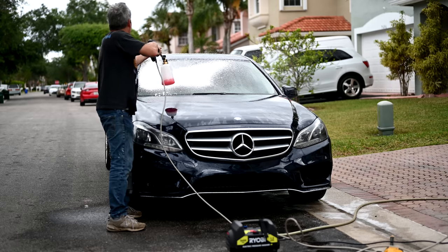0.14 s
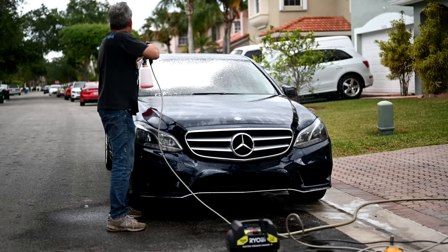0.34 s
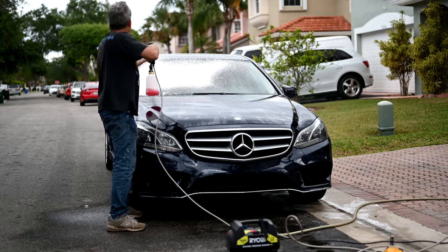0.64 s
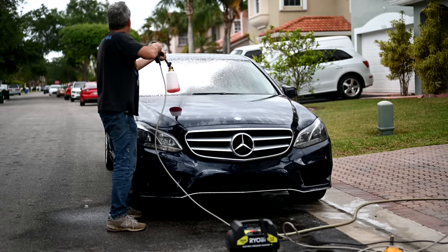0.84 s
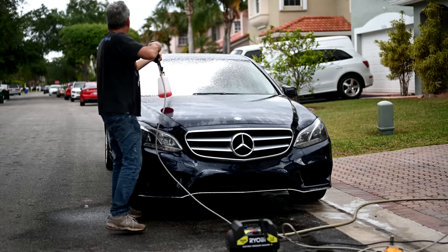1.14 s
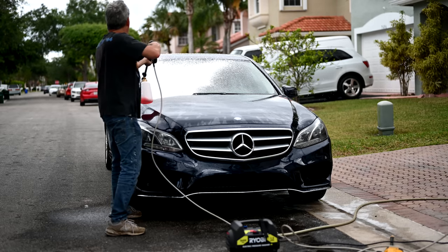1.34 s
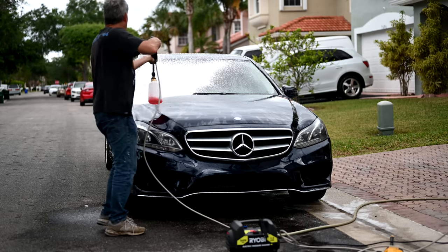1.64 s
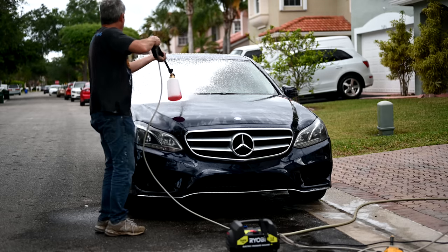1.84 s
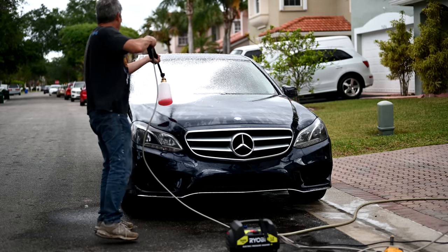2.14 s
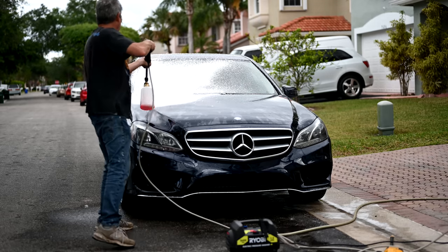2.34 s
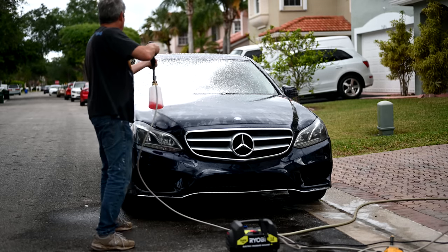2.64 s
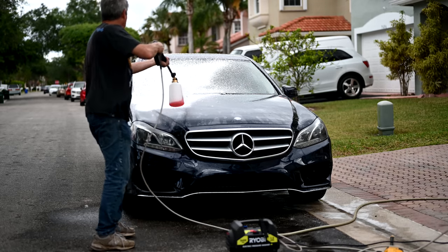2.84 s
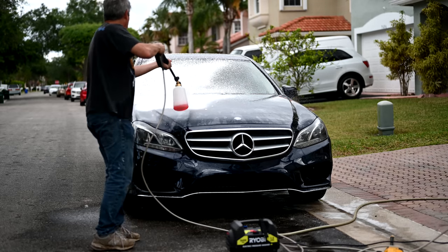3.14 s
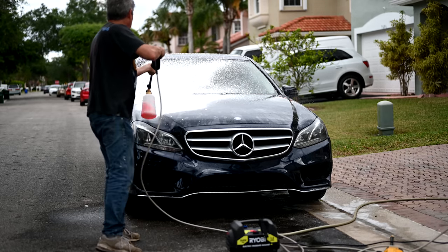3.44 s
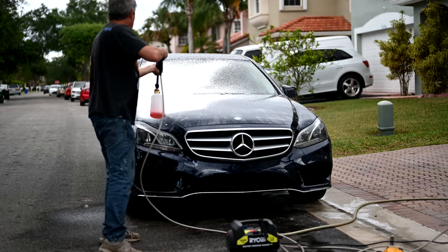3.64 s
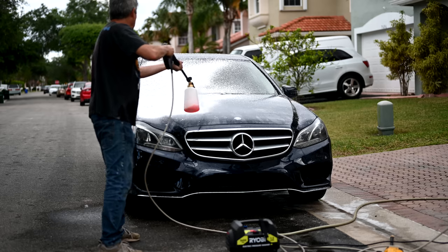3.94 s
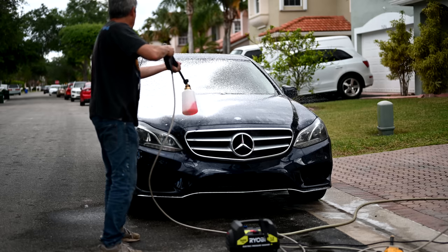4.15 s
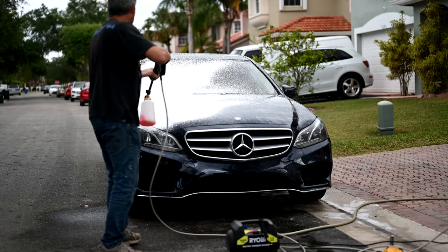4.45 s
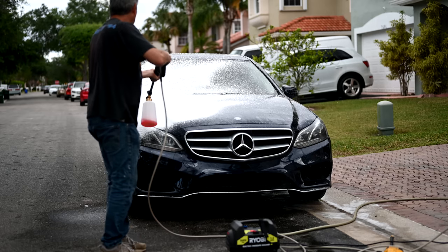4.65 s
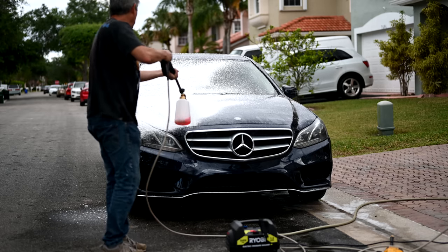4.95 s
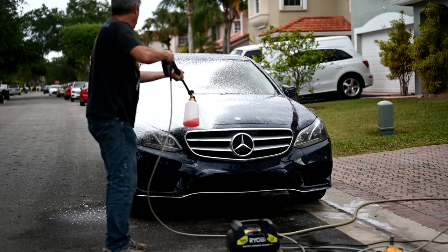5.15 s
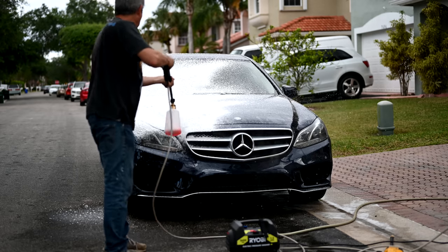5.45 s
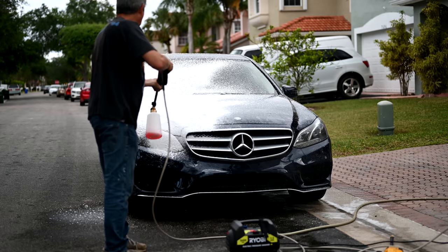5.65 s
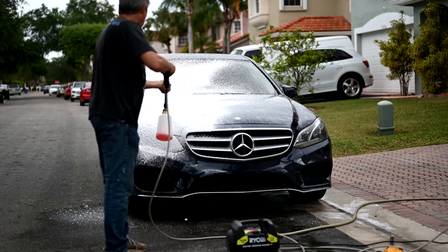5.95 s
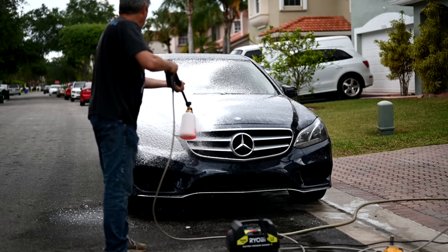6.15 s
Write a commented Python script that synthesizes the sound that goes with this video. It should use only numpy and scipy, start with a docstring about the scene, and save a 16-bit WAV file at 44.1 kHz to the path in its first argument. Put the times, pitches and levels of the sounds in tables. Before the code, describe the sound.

An electric pressure washer runs continuously on an open street, feeding a foam sprayer swept over a parked car. A midrange nozzle roar and broad rushing spray dominate, dipping briefly at some sweep ends. A thin, very high motor whine wavers and slowly climbs over faint pump hum. The roar weakens in the second half as crisp droplet hiss grows. Soft drumming on bodywork and faint wind puffs reach one open-air microphone.

```python
"""An open street, one microphone: an electric pressure washer feeds a foam cannon swept over a parked car.
Sines locked to one shaft make the motor's whine and the pump's hum; two shifting resonances make the roar.
Filtered noise and tiny impacts make the rush, fizz, droplet hiss and the drumming on the panels;
the hiss grows louder towards the end. Light gusts, low filtered noise, rumble on the microphone.
"""
import sys
import numpy as np
from scipy import signal
from scipy.fft import rfft, irfft, next_fast_len
from scipy.io import wavfile
from scipy.ndimage import uniform_filter1d

SR = 44100
rng = np.random.default_rng(int(sys.argv[2]) if len(sys.argv) > 2 else 0)


def wav_record(signal):
    """Record a signal, one row per channel, as 16-bit PCM in the file named by sys.argv[1]."""
    frames = np.transpose(np.atleast_2d(signal))
    bounded = np.clip(frames, -1, 1)
    # unit amplitude maps onto the largest positive 16-bit level
    quanta = np.round(bounded * 32767).astype(np.int16)
    wavfile.write(sys.argv[1], SR, quanta)


N = 278003  # length in samples

# Whine cycles, and pump strokes, per turn of the motor shaft.
WHINE_ORDER, PUMP_GEAR = 22, .22

# The motor slowly gathers speed. Each row: time in seconds, course of the whine's pitch in Hz.
WHINE_PITCH = [(0, 6060), (1.05, 6160), (1.75, 6205), (2.6, 6188), (3.0, 6250), (3.7, 6220), (4.5, 6290),
               (5.1, 6250), (6.3, 6352)]


def shaft_turns(wander_hz=10):
    """Turns of the motor shaft so far: its speed summed over time, straying at random from its course."""
    course_hz, = curves(WHINE_PITCH)
    whine_hz = course_hz + wander_hz * walk(6.98)
    return np.cumsum(whine_hz / WHINE_ORDER) / SR


# Strength of the whine before its fades. Each row: time in seconds, level in dB.
WHINE_STRENGTH = [(0, -50), (.3, -36.5), (1.42, -38.5), (1.76, -28), (1.9, -34.5), (2.38, -28.5),
                  (2.72, -41), (3.0, -27.5), (3.45, -28.5), (3.7, -22), (4.2, -29.5), (4.55, -27.5),
                  (4.95, -30), (5.12, -43), (5.5, -22.5), (5.78, -31), (6.03, -25), (6.3, -26)]
# The whine fades for moments. Each row: centre in seconds, length in seconds, drop in dB.
WHINE_DROPS = [(1.23, .1, 5), (2.29, 0.08, 12), (2.459, 0.051, 8), (3.537, 0.08, 14), (3.746, 0.054, 11),
               (3.91, .05, 6), (4.771, .1, 9)]


def motor_whine(turns, sway_rad=0.29, throb=0.24, flutter_rad=0.3, waver_db=2.0):
    """Every pump stroke loads the motor, so its whine sways in pitch and throbs in strength."""
    stroke = 2 * np.pi * PUMP_GEAR * turns
    level_db, = curves(WHINE_STRENGTH)
    for centre_s, length_s, drop_db in WHINE_DROPS:
        level_db = level_db - drop_db * bump(centre_s, length_s)
    phase = 2 * np.pi * WHINE_ORDER * turns + sway_rad * np.sin(stroke) + flutter_rad * walk(90)
    strength = undb(level_db + waver_db * walk(24.5)) * (1 - throb * np.cos(stroke))
    return strength * np.sin(phase)


# Other motor tones. Each row: multiple of the shaft rate, level in dB at the start, midway and at the end.
MOTOR_HARMONICS = [(11, -38.5, -46.5, -67), (20, -63, -49, -43.5), (21, -66, -52, -46), (23, -62, -41, -32),
                   (24, -60, -46, -47), (33, -47.5, -47.5, -58), (44, -63, -57, -54)]
# Pump hum and gear whine. Each row: multiple of the stroke rate (rounded to a whole number when played),
# level in dB at the start, midway and at the end.
PUMP_HARMONICS = [(3, -61, -57, -50.5), (4, -52, -52, -48.5), (5, -56.5, -58.5, -57), (6, -57, -59, -53),
                  (9, -58, -49, -48.5), (10, -69, -59, -52), (11, -68, -54.5, -50.5),
                  (12, -60.5, -48, -47.5), (107.5, -58, -40.5, -36)]


def washer(turns):
    """Motor whine, once-a-turn hum of the shaft, other motor tones and the geared piston pump."""
    shaft = undb(-56) * np.sin(2 * np.pi * turns)
    shaken_turns = turns + .0026 * walk(40)  # slight unsteadiness, in turns
    motor = tones(MOTOR_HARMONICS, shaken_turns, waver_db=3.6)
    pump = tones(PUMP_HARMONICS, PUMP_GEAR * turns, waver_db=2.37)
    return np.sqrt(2) * (motor_whine(turns) + shaft + motor + pump)  # root 2: levels are rms


def tones(table, turns, waver_db):
    """Harmonics of a rotation; each drifts in level and wavers on its own."""
    total = np.zeros(N)
    progress = np.linspace(0, 2, N)  # start, midway, end
    for order, *levels_db in table:
        level_db = np.interp(progress, np.arange(len(levels_db)), levels_db) + waver_db * walk(6)
        phase = 2 * np.pi * (round(order) * turns + rng.random())
        total += undb(level_db) * np.sin(phase)
    return total


# The lance sweeps to and fro; at the far end of a sweep the jet points away from the car.
# Each row: centre in seconds, length in seconds, drop of the roar in dB.
SWEEP_ENDS = [(1.37, 0.14, 3.5), (2.422, 0.15, 6), (4.522, .17, 7), (5.521, 0.084, 5.5)]


def pointing_away(edge=2.8):
    """Drop of the roar in dB as the jet leaves the car and returns."""
    return sum(drop_db * bump(centre_s, length_s, edge) for centre_s, length_s, drop_db in SWEEP_ENDS)


# The cannon's resonances shift as the lance is lowered. Each row: time in seconds,
# lower resonance and its width in Hz, upper resonance and its width in Hz.
CANNON_RESONANCES = [(0, 2140, 480.5, 2680, 952), (.42, 2222, 479.5, 2562, 850),
                     (.7, 2020, 779.4, 2770, 629), (1.3, 2130, 649, 2858, 580),
                     (1.8, 2250, 540, 2689, 538.8), (2.3, 2190, 487.7, 2664, 620),
                     (2.7, 2030, 419, 2728, 619), (4.3, 1846, 431.6, 2704, 817.3),
                     (5.1, 1932, 827.6, 2745, 753), (6.3, 2150, 621, 2750, 850)]
# The roar before the sweeps. Each row: time in seconds, lower and upper resonance level in dB.
ROAR_LEVELS = [(0, -32, -25), (.45, -27, -24), (.92, -26.5, -22), (1.55, -30, -25), (1.71, -25, -20),
               (1.88, -26, -25), (2.3, -29, -21.5), (2.58, -25.5, -25.5), (2.8, -26, -23.5),
               (3.05, -29.5, -23.5), (3.25, -25, -24.5), (3.36, -28, -31), (3.65, -34, -33),
               (3.8, -30, -29.5), (4.3, -31.5, -28.5), (4.7, -33.5, -34.5), (5.35, -34, -29),
               (5.82, -38, -35.5), (6.3, -35.5, -36)]


def cannon(away_db, sputter_db=0.1):
    """Air and soap churn through the nozzle, which roars unevenly in two resonances."""
    lower_hz, lower_width, upper_hz, upper_width = curves(CANNON_RESONANCES)
    lower_db, upper_db = curves(ROAR_LEVELS)
    lower = undb(lower_db) * resonance(lower_hz, lower_width)
    upper = undb(upper_db) * resonance(upper_hz, upper_width)
    return (lower + upper) * undb(sputter_db * walk(73) - away_db)


def resonance(hz, width_hz):
    """Turbulence in a steep-sided resonance: a tone whose strength and phase tumble faster the wider it is."""
    place = np.cumsum(width_hz) / SR * 20  # wider resonances read through the noise faster
    real, imaginary = rng.standard_normal((2, 2 * N))
    lowpass = signal.butter(3, 1 / 20, output="sos")
    tumble = signal.sosfilt(lowpass, real + 1j * imaginary)
    tone = np.exp(2j * np.pi * np.cumsum(hz) / SR)
    return unit(np.real(np.interp(place, np.arange(2 * N), tumble) * tone))


# The spray moves from the windscreen to the bonnet.
# Each row: time in seconds, then rush, fizz of the foam and droplet hiss, as levels in dB before the sweeps.
SPRAY_LEVELS = [(0, -26, -49, -40.5), (.5, -27.5, -47, -43), (.73, -27.5, -37, -32), (1.2, -29, -42, -34),
                (1.67, -27, -36, -32.5), (1.95, -28, -39, -36.5), (2.6, -27, -36, -32),
                (3.0, -30.5, -41, -34), (3.36, -30.5, -40.5, -30.5), (3.44, -30, -39, -27.5),
                (4.2, -30, -41, -30.5), (4.57, -30.5, -41, -24.5), (4.68, -29.5, -38, -23.5),
                (5.82, -30, -35, -21.5), (6.04, -28, -37, -19.5), (6.3, -29.5, -34, -22)]
# Spray drumming on the bodywork. Each row: time in seconds, level in dB.
DRUMMING_LEVEL = [(0, -39.5), (1.35, -37.5), (1.72, -35.5), (3.0, -35.5), (4.4, -35.5), (6.3, -34)]
# Spectra of the four spray layers. Each row: frequency in Hz, relative density in dB per Hz.
RUSH_SPECTRUM = [(400, -28), (800, -11.5), (1080, -1.5), (1420, -1), (2000, 2.5), (3300, 3), (4100, 1),
                 (4700, 0), (5900, -1), (6800, -12), (9000, -16), (15000, -37)]
FIZZ_SPECTRUM = [(6000, -25), (9000, 3.5), (10200, 0.5), (11400, 4), (12500, 2), (13300, -9), (14200, -15),
                 (16000, -21)]
HISS_SPECTRUM = [(4000, -41), (5700, -15.5), (6300, 1), (6750, 0), (7200, 1), (8200, 2), (9100, -1.5),
                 (10000, -7), (11000, -10), (12400, -33), (14000, -17), (16000, -23)]
PANEL_SPECTRUM = [(60, -47), (130, -11.5), (220, -2.5), (300, -0.5), (450, 2), (700, 0), (1050, 1),
                  (1400, -4), (2200, 3), (4000, -22.5), (8000, -34)]


def spray(turns, away_db, pulsing=0.096, sweep_share=0.65):
    """The jet rushes, foam fizzes and droplets land; jet and fine spray pulse with the pump."""
    rush_db, fizz_db, hiss_db = curves(SPRAY_LEVELS)
    panel_db, = curves(DRUMMING_LEVEL)
    rush = undb(rush_db) * colour(rng.standard_normal(N), RUSH_SPECTRUM)
    rush = reflect(rush, body_db=-16.5, road_db=-22)
    fizz = undb(fizz_db) * colour(droplets(per_second=4000, spread_db=3, mist_db=7), FIZZ_SPECTRUM)
    hiss = undb(hiss_db) * colour(droplets(per_second=4500, spread_db=3, mist_db=-4.0), HISS_SPECTRUM)
    panels = undb(panel_db) * colour(droplets(per_second=2500, spread_db=3.5, mist_db=3), PANEL_SPECTRUM)
    # the spray drops by a share of the roar's drop, in dB
    jet = (rush + fizz + hiss) * undb(-sweep_share * away_db)
    pulse = 1 + pulsing * np.cos(2 * np.pi * PUMP_GEAR * turns)
    return jet * pulse + panels


def droplets(per_second, spread_db, mist_db):
    """Tiny impacts of uneven size, all pushing the same way, over a smooth mist."""
    hit = rng.random(N) < per_second / SR
    size = np.minimum(rng.exponential(size=N), 5)  # caps the rare giants
    impacts = hit * undb(spread_db * size)
    mist = undb(mist_db) * rng.standard_normal(N)  # level relative to the impacts
    return mist - unit(impacts - impacts.mean())


# The echo off the bodywork shifts as the jet moves, mostly later. Each row: time in seconds, lag in ms.
BODY_ECHO = [(0, 0.9), (.42, 0.89), (.65, .7), (1.45, .68), (2.45, 0.89), (2.8, 1.01), (3.7, 1.023),
             (3.92, 1.54), (5.2, 2.46), (6.3, 2.65)]


def reflect(x, body_db=-10, road_db=-14, dull_hz=7000):
    """Bodywork and road throw the sound back; the moving lags comb it into a hollow swoosh."""
    dull = signal.sosfilt(signal.bessel(1, dull_hz, fs=SR, output="sos"), x)
    body_ms, = curves(BODY_ECHO)
    road_ms = 4.25 + .12 * walk(1)  # drifts gently
    now = np.arange(N)
    body = np.interp(now - body_ms * SR / 1000, now, dull)
    road = np.interp(now - road_ms * SR / 1000, now, dull)
    return x + undb(body_db) * body + undb(road_db) * road


# Puffs of wind on the microphone. Each row: centre in seconds, length in seconds, level in dB.
WIND_PUFFS = [(0.971, 0.23, -47), (1.859, 0.19, -42), (2.179, .07, -47), (2.309, 0.079, -44),
              (2.663, .17, -54), (3.439, .1, -47), (4.007, .06, -42), (4.469, 0.11, -49),
              (4.75, 0.23, -49.5)]
# Spectrum of the wind. Each row: frequency in Hz, relative density in dB per Hz.
WIND_SPECTRUM = [(15, -30), (28, -13), (55, -6.5), (85, -2), (130, -1), (220, -9.5), (450, -8), (1500, -43)]


def wind(buffet_db=2.5):
    """Soft puffs over a light breeze rumble and buffet on the microphone."""
    # light air under the puffs, rising to one broad swell
    strength = undb(-62.5) + undb(-58) * bump(at_s=3.1, length_s=1.7)
    for centre_s, length_s, level_db in WIND_PUFFS:
        strength = strength + undb(level_db) * bump(centre_s, length_s)
    rumble = colour(rng.standard_normal(N), WIND_SPECTRUM)
    return strength * undb(buffet_db * walk(25)) * rumble


def undb(db):
    """Decibels to gain."""
    return 10 ** (np.asarray(db) / 20)


def unit(x):
    """Scale to rms 1."""
    return x / np.sqrt(np.mean(x ** 2))


def curves(table):
    """The columns of a table, joined by straight lines in time."""
    times_s, *columns = np.transpose(table)
    return [np.interp(np.arange(N) / SR, times_s, column) for column in columns]


def walk(rate):
    """Smooth chance with rms 1, changing about rate times a second: noise averaged twice."""
    size = max(int(SR / rate), 2)
    once = uniform_filter1d(rng.standard_normal(N), size, mode="wrap")
    return unit(uniform_filter1d(once, size, mode="wrap"))


def colour(x, points):
    """Filter x by a curve of (Hz, dB) points, straight over log frequency, and scale to rms 1."""
    hz, db = np.transpose(points)
    size = next_fast_len(N)
    bins_hz = np.maximum(np.arange(size // 2 + 1) * SR / size, 1)
    gain = undb(np.interp(np.log(bins_hz), np.log(hz), db))
    return unit(irfft(rfft(x, size) * gain, size)[:N])


def bump(at_s, length_s, edge=2):
    """A smooth swell of height 1, its length taken at half height; a higher edge makes it squarer."""
    distance = np.abs(2 * (np.arange(N) / SR - at_s) / length_s)
    return 2 ** -(distance ** edge)


def scene(flow_db=0.84):
    """One shaft drives whine, pump and jet; both channels carry the same sound."""
    turns = shaft_turns()
    away_db = pointing_away()
    # the foam leaves in uneven slugs, which shake roar and spray together
    flow = undb(flow_db * walk(86))
    foam = flow * (reflect(cannon(away_db)) + spray(turns, away_db))
    mono = washer(turns) + foam + wind()
    return np.array([mono, mono])


# A brief dip in level: centre in seconds, half-width in seconds (to 1/e of the depth), depth from 0 to 1.
DIP_S, DIP_WIDTH_S, DIP_DEPTH = 2.524, .004, .75


def record(dry, low_hz=45, top_hz=15700):
    """The level dips once, very briefly; the recorder thins the deepest bass and cuts the top."""
    dip = 1 - DIP_DEPTH * np.exp(-((np.arange(N) / SR - DIP_S) / DIP_WIDTH_S) ** 2)
    bass_cut = signal.butter(3, low_hz, "highpass", fs=SR, output="sos")
    top_cut = signal.ellip(12, .1, 90, top_hz, fs=SR, output="sos")  # ripple and stopband in dB
    return signal.sosfilt(top_cut, signal.sosfilt(bass_cut, dry * dip))


dry = scene()
out = record(dry)
wav_record(out)
```